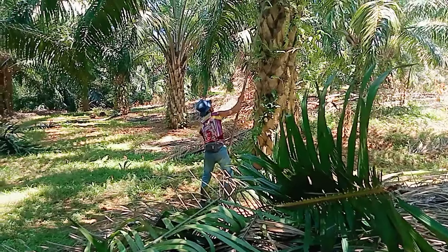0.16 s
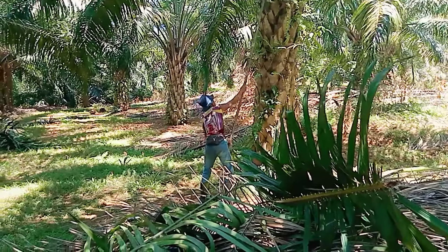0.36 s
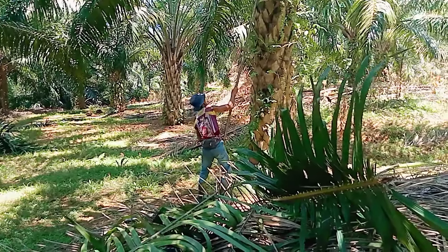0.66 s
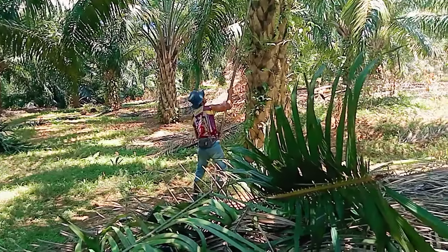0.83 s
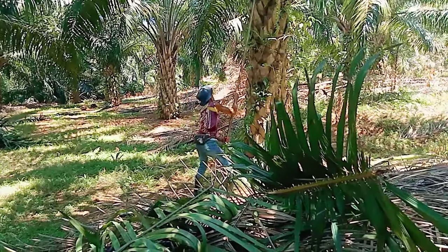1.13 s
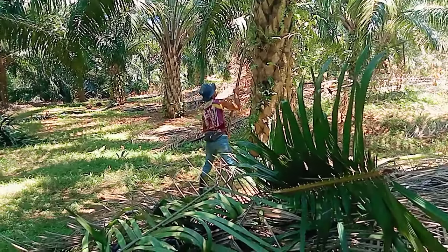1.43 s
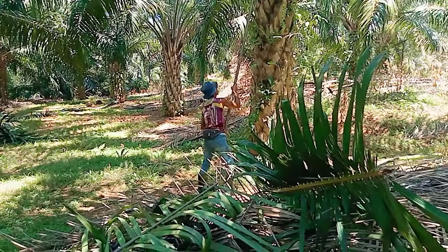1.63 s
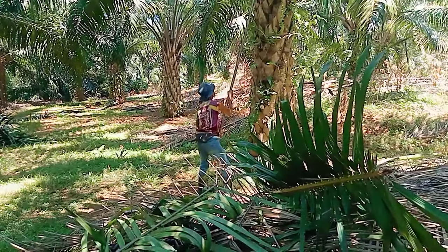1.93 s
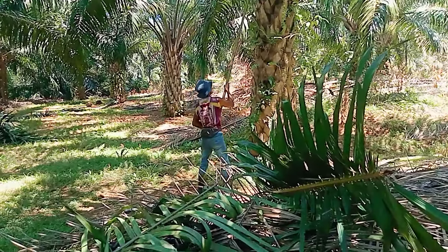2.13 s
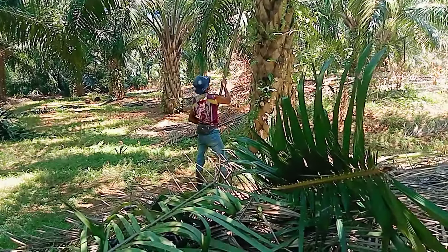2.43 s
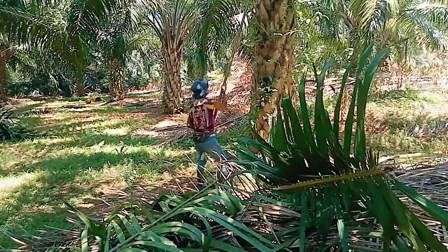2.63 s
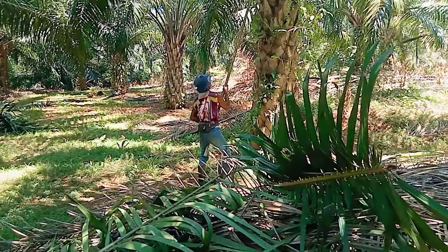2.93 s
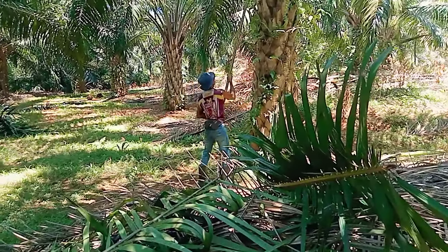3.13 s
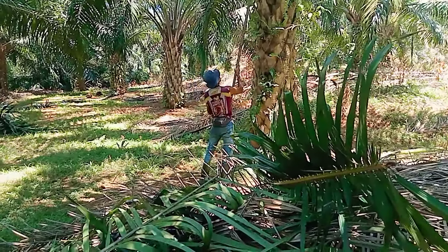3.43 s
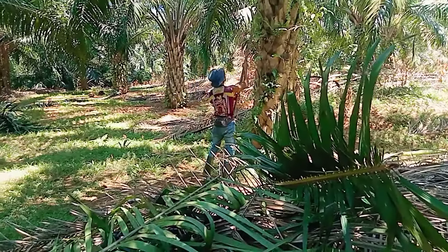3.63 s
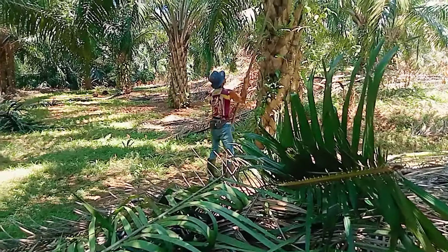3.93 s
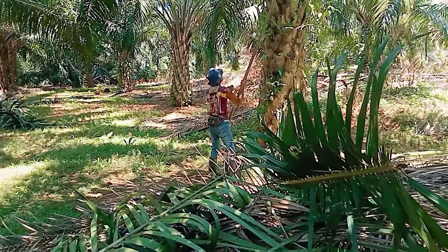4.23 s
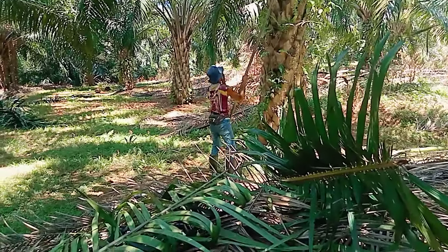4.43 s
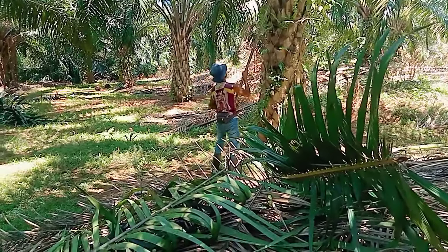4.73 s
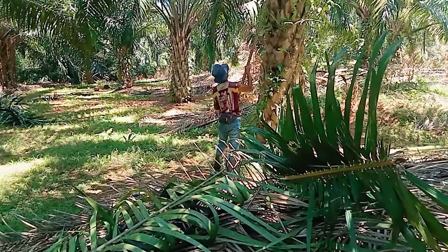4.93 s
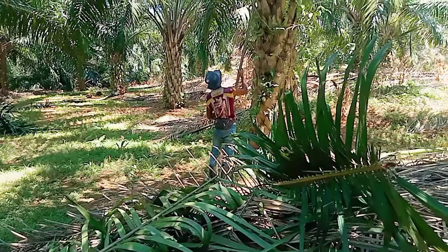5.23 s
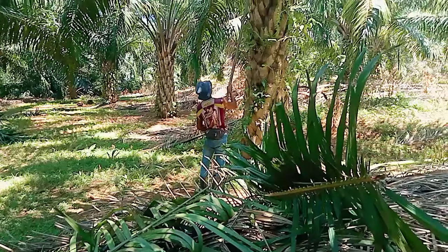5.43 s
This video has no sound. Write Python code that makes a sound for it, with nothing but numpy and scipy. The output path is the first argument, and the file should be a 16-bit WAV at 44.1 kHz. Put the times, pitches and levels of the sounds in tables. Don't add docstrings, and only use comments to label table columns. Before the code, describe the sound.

Irregular dull knocks and dry snaps on fibrous palm wood, leafy scraping, then a cut frond rustles down over a steady cicada drone.

```python
import sys
import numpy as np
from scipy import signal
from scipy.io import wavfile

SR = 44100
rng = np.random.default_rng(int(sys.argv[2]) if len(sys.argv) > 2 else 0)


def transcribe(u):
    v = np.clip(np.atleast_2d(u).T, -1, 1)
    q = np.round(v * 32767).astype(np.int16)
    wavfile.write(sys.argv[1], SR, q)


def decibels_to_gain(level_db):
    exponent = np.asarray(level_db, float) / 20
    return 10 ** exponent


N = 245637
CUT_S = 4.09


def rms_one(x):
    return x / np.sqrt(np.mean(x ** 2) + 1e-20)


def peak_one(x):
    return x / np.abs(x).max()


def in_time(rows):
    s, *columns = np.transpose(rows)
    return [np.interp(np.arange(N) / SR, s, column) for column in columns]


def band(x, low_hz, high_hz, order=2):
    sos = signal.butter(order, [low_hz, high_hz], "band", fs=SR, output="sos")
    return signal.sosfilt(sos, x)


def drift(rate_hz):
    r = np.exp(-80 * np.pi * rate_hz / SR)
    white = rng.standard_normal(N // 40 + 2002)
    slow = signal.lfilter([1], [1, -2 * r, r * r], white)[2000:]
    return np.interp(np.arange(N) / 40, np.arange(len(slow)), rms_one(slow))


def ring(clicks, hz, t60):
    r, w = decibels_to_gain(-60 / (t60 * SR)), 2 * np.pi * hz / SR
    return signal.lfilter([0, np.sin(w)], [1, -2 * r * np.cos(w), r * r], clicks + 1e-18)


def grains(per_s, spread_db, clump_db):
    size_db = spread_db * np.minimum(rng.exponential(1, N), 5)
    sizes = decibels_to_gain(size_db) * rng.choice([-1, 1], N)
    chance = per_s * decibels_to_gain(clump_db * drift(25)) / SR
    return rms_one(sizes * (rng.random(N) < chance))


def add(out, s, sound):
    at = int(s * SR)
    out[at:at + len(sound)] += sound[:N - at]


# start in seconds, peak level in dB, low mode in Hz, high mode in Hz,
# level of the high mode in dB re the low one.
KNOCKS = [(0.515, -39, 640, 1550, 2.5), (0.738, -44, 580, 1140, 4.5), (0.776, -42, 620, 2120, -3),
          (0.83, -42, 630, 2100, -5), (1.187, -33.5, 603, 1200, -12), (1.295, -26, 646, 1290, -11),
          (1.304, -35, 610, 1050, -14), (1.376, -24, 507, 1250, -2), (1.407, -18, 692, 1675, -5),
          (1.485, -28, 499, 997, -0.5), (1.814, -33, 460, 1040, -12), (2.198, -23, 641, 1175, -6),
          (2.226, -30.5, 303, 1660, -27), (2.592, -39.5, 433, 1900, -14), (2.856, -33.5, 747, 1145, -1.5),
          (2.922, -24.5, 770, 1673, -1.5), (2.997, -31.5, 385, 1060, -18), (3.338, -34.5, 263, 1570, -8),
          (3.538, -47.5, 680, 1570, -10), (4.064, -29, 280, 926, -28), (4.075, -26, 524, 1645, -10),
          (4.088, -28.5, 280, 1494, -7)]
# start in seconds, peak level in dB, low mode in Hz,
# high mode in Hz, level of the high mode in dB re the low one.
CHOPS = [(2.097, -51, 800, 2160, 3), (2.139, -24, 756, 1670, -6.5), (2.1476, -24.5, 1086, 1670, 2.5),
         (2.332, -49.5, 640, 2160, 5.5), (2.375, -27, 1300, 2120, -1), (2.477, -41.5, 1410, 2050, -4),
         (2.9289, -25, 674, 1670, 3.5), (3.284, -20, 318, 590, -11), (3.2918, -17.5, 560, 2060, -7.5),
         (3.2925, -24, 1120, 1600, -6), (3.555, -68, 770, 1930, -2), (4.3834, -15, 1080, 1640, 0.5)]
KNOCK_T60_S, CHOP_T60_S = 0.074, 0.024
KNOCK_CONTACT_S, CHOP_CONTACT_S = 0.0013, 0.0004


def wood_mode(push, crush, hz, t60, spread):
    t = np.arange(len(push)) / SR
    rings = rms_one(ring(push, hz, t60))
    for k in spread:
        rings = rings + 0.2 * rms_one(ring(push, hz * 1.51 ** k, 1.2 * t60))
    crush_shape = (1 - np.exp(-t / 0.0015)) * decibels_to_gain(-60 * t / (1.3 * t60))
    crushed = band(crush * crush_shape, 0.6 * hz, 1.6 * hz)
    both = peak_one(rings) + 0.28 * peak_one(crushed)
    return band(both, 0.58 * hz, 1.8 * hz) / np.abs(both).max()


def knocks():
    out, t = np.zeros(N), np.arange(int(0.2 * SR)) / SR
    blows = [(*row, KNOCK_T60_S, KNOCK_CONTACT_S) for row in KNOCKS]
    blows += [(*row, CHOP_T60_S, CHOP_CONTACT_S) for row in CHOPS]
    for s, peak_db, low_hz, high_hz, high_db, t60, contact in blows:
        crumble, low_crush, high_crush = rng.standard_normal((3, len(t)))
        low_spread, high_spread = rng.uniform(-0.35, 1, (2, 3))
        push = (crumble + 0.8) * t * np.exp(-t / contact)
        low = wood_mode(push, low_crush, low_hz, t60, low_spread)
        high = wood_mode(push, high_crush, high_hz, 0.75 * t60, high_spread)
        add(out, s - 1.222 * contact, decibels_to_gain(peak_db + 1.8) * (low + decibels_to_gain(high_db + 1.1) * high))
    return out


# start in seconds, peak level in dB.
CRACKS = [
    (0.507, -33.5),
    (1.328, -36),
    (2.1485, -29),
    (2.376, -31),
    (2.478, -43),
    (2.593, -35),
    (2.855, -36),
    (2.929, -19.5),
    (3.2912, -34),
    (4.3836, -22),
]


def cracks():
    out, t = np.zeros(N), np.arange(500) / SR
    for s, peak_db in CRACKS:
        burst = band(rng.standard_normal(len(t)) * np.exp(-t / 0.0012), 700, 7800, order=1)
        add(out, s, decibels_to_gain(peak_db) * peak_one(burst))
    return out


# start in seconds, peak
# level in dB, duller part in dB re the peak.
SNAPS = [(0.5094, -17, -16), (0.516, -19.5, -28), (0.729, -30, -24), (0.7362, -37, -22), (1.0614, -36, -17),
         (1.085, -37, -21), (1.1094, -38, -15), (1.1513, -36, -24), (1.2374, -45, -9), (1.3076, -39.5, 6.5),
         (1.328, -31, -19), (1.3763, -27, -12), (1.4068, -6.5, -16), (1.4143, -17, -21), (1.719, -38, -16),
         (1.932, -41, -4.5), (2.097, -48.5, 5.5), (2.119, -38, -4), (2.136, -26, -25), (2.148, -14.5, -36),
         (2.375, -25, -41), (2.3845, -32, -31), (2.478, -29, -29), (2.595, -29, -34), (2.854, -47, 9),
         (2.9124, -20, -28), (2.928, -20, -21), (3.2897, -30.5, 9.5), (3.556, -52, -12),
         (4.0706, -35.5, 1), (4.208, -27, -7), (4.224, -17, -28), (4.247, -23, -12),
              (4.2654, -18.5, -9), (4.2724, -31, -14), (4.383, -12.5, -7.5), (4.568, -28, -3.5),
              (4.605, -31, -15), (4.6244, -25, -16), (4.635, -28, -0.5), (4.739, -23, -23),
              (4.763, -18, -20), (4.785, -23, -25), (4.8013, -24, -23), (4.8514, -21, -8),
              (4.8824, -29, -18), (5.028, -21.5, -14), (5.237, -28, -14), (5.266, -23.5, -13),
              (5.361, -30, -13), (5.5355, -34, -10)]


def snaps():
    out, t = np.zeros(N), np.arange(600) / SR
    for s, peak_db, dull_db in SNAPS:
        burst = rng.standard_normal(len(t)) * np.exp(-t / 0.0012)
        bright = peak_one(band(burst, 5300, 11800))
        dull = peak_one(band(burst, 2600, 4230, order=1))
        add(out, s + 0.0005, decibels_to_gain(peak_db - 5) * (bright + decibels_to_gain(dull_db + 8.5) * dull))
    return out


# peak time in seconds, leaflet rustle in dB,
# stalk scrape in dB re the rustle, rise in seconds, fall in seconds.
DRAGS = [(.12, -57, 9.5, 0.032, 0.099), (0.181, -49.5, 8.5, 0.1, 0.043), (0.736, -41, 7.5, 0.021, 0.17),
         (.82, -42.5, 3.5, 0.08, 0.075), (1.084, -59.5, -1, 0.16, 0.12), (1.195, -59.5, 17.5, 0.062, 0.25),
         (1.243, -43.5, 11, 0.079, 0.041), (1.331, -39.5, -8, 0.0064, .15), (1.377, -25, 9.5, 0.053, .09),
         (1.49, -49, -0.5, .1, 0.31), (1.74, -56, -3, 0.19, 0.33), (2.355, -57, 13, 0.07, 0.086),
         (2.874, -57, 19.5, 0.03, 0.19), (2.924, -35.5, 7, 0.043, 0.079), (3.27, -56, 18.5, 0.05, 0.072),
         (3.34, -52, 5, 0.088, .26)]
# peak time in seconds, rustle in dB,
# stalk scrape in dB re the rustle, fall in seconds.
STIRS = [(0.515, -44, 4, 0.071), (1.811, -56.5, 18.5, 0.093), (1.93, -58.5, 10.5, .1),
         (2.143, -39, 9, 0.077), (2.2, -49.5, 11, 0.097), (2.376, -47, 6, 0.07), (2.48, -58, -4, 0.29),
         (2.594, -55, 3.5, .07), (3.0, -53.5, -8, 0.18), (3.295, -45, 15.5, 0.068), (3.561, -53, -19, 0.15),
         (4.085, -40, 2, 0.019), (4.39, -35, -15, 0.086), (4.6, -40, -18, 0.15), (5.029, -40.5, -5.5, 0.06),
         (5.499, -55.5, 4.5, .04)]
# time in seconds, rustle in dB, stalk swish in dB re the rustle.
FALL = [
    (4.06, -70, 16),
    (4.1, -47.5, 1),
    (4.21, -43, 5),
    (4.42, -41.5, 1),
    (4.74, -43, -7.5),
    (4.9, -36.5, -6),
    (5.06, -51, -7),
    (5.25, -49.5, -6.5),
    (5.57, -54.5, -24),
]
JOLT_RISE_S = 0.023
SPAN_DB = 19
STALK_STEEPER = 1.29
REST_DB, REST_STALK_DB = -67, -87


def stirring():
    t = np.arange(N) / SR
    fall_db, swish_db = in_time(FALL)
    falling = t > FALL[0][0]
    leaves = decibels_to_gain(REST_DB) ** 2 + falling * decibels_to_gain(fall_db) ** 2
    stalk = decibels_to_gain(REST_STALK_DB) ** 2 + falling * decibels_to_gain(fall_db + swish_db) ** 2
    jolts = [(s, db, stalk_db, JOLT_RISE_S, fall) for s, db, stalk_db, fall in STIRS]
    for s, db, stalk_db, rise, fall in [*DRAGS, *jolts]:
        near = slice(max(int((s - 3 * rise) * SR), 0), int((s + 3 * fall) * SR))
        after = t[near] - s
        loss_db = SPAN_DB * np.where(after < 0, -after / rise, after / fall)
        leaves[near] += decibels_to_gain(db - loss_db) ** 2
        stalk[near] += decibels_to_gain(db + stalk_db - STALK_STEEPER * loss_db) ** 2
    return 10 * np.log10(leaves), 10 * np.log10(stalk)


# frequency in Hz, level in dB, t60 in seconds.
STALK = [(280, -8.5, 0.045), (346, -6.5, 0.073), (487, -0.5, 0.041), (570, -2.5, 0.042), (638, 1.5, 0.06),
         (770, 3, 0.021), (1057, -8, 0.034), (1155, -6, 0.027), (1670, -15, 0.094)]
CRACKLE_DB, CRACKLE_FREE_DB = -9.5, -7
CRACKLE_SLOPE = 0.05


def strokes():
    rustle_db, scrape_db = stirring()
    held = np.arange(N) < CUT_S * SR
    rubbing = grains(6000, 2.7, clump_db=2.5)
    rustle = rms_one(band(rubbing, 980, 8950)) * decibels_to_gain(rustle_db + 1.0)

    crackle_db = rustle_db + np.where(held, CRACKLE_DB, CRACKLE_FREE_DB) + CRACKLE_SLOPE * (rustle_db + 50.5)
    edges = rubbing + 0.5 * grains(900, 0.74, clump_db=-7.5)
    crackle = rms_one(band(edges, 6060, 16660)) * decibels_to_gain(crackle_db + 6.5)

    slips = grains(2500, 3.2, clump_db=2.0) * decibels_to_gain(scrape_db - 2.0)
    body = np.zeros(N)
    for hz, db, t60 in STALK:
        body += decibels_to_gain(db - 34.5 + 2.5 * drift(8)) * ring(slips, hz, t60)
    body = band(body, 250, 8700) * decibels_to_gain(np.where(held, 1.5, -7))
    swish = np.where(held, 0.43 * band(slips, 140, 1620, order=3), 3.86 * band(slips, 89, 880))
    return rustle + crackle + body + swish


# start in seconds, peak level in dB.
BOUNCES = [
    (4.2657, -20.5),
    (4.273, -27),
    (4.3098, -22),
    (4.33, -41),
    (4.355, -23),
    (4.3767, -19),
]


def bounces():
    clicks = np.zeros(N)
    for s, peak_db in BOUNCES:
        clicks[int(s * SR)] = decibels_to_gain(peak_db - 3.0)
    clicks = band(clicks, 300, 2500, order=1)
    return ring(clicks, 785, t60=0.03) + ring(clicks, 1040, t60=0.021)


# start in seconds,
# frequency in Hz, level in dB, t60 in seconds.
BLADE = [(3.293, 2945, -45, .25), (3.293, 2920, -47, .25), (3.293, 2875, -49, .2), (3.293, 3030, -51, .1),
         (3.557, 3500, -53, .16), (3.557, 3515, -60, .1), (.722, 1150, -44, .1), (.736, 1150, -38, .08),
         (.09, 2800, -62, .2), (.12, 2740, -60, .15), (.122, 2050, -56, .09), (.15, 2150, -57, .09)]


def blade():
    out, t = np.zeros(N), np.arange(SR // 2) / SR
    for s, hz, db, t60 in BLADE:
        add(out, s, decibels_to_gain(db - 60 * t / t60) * np.sin(2 * np.pi * hz * t))
    return out


GROVE_T60_S, GROVE_DB = 0.12, -16.5


def grove(x):
    t = np.arange(int(0.5 * SR)) / SR
    tail = band(rng.standard_normal(len(t)), 150, 4100, order=1) * decibels_to_gain(-60 * t / GROVE_T60_S)
    tail = tail * (t > 0.004)
    return decibels_to_gain(GROVE_DB) * signal.fftconvolve(x, tail / np.sqrt(np.sum(tail ** 2)))[:N]


# centre in Hz, width in Hz, level in dB.
CICADAS = [(6840, 70, -17.5), (7005, 270, 2), (7437, 167, -0.5), (7620, 110, -2.5), (7735, 200, -7),
           (8750, 620, -20), (14100, 760, -11.5), (14400, 560, -12), (15070, 540, -8.5)]
# time in
# seconds, level in dB.
CICADA_DB = [
    (0.0, -50),
    (0.54, -52.5),
    (1.55, -50),
    (2.11, -50.5),
    (4.03, -52),
    (4.39, -53),
    (4.84, -40),
    (5.01, -49),
    (5.57, -51.5),
]


def cicadas():
    clicks = grains(6000, 0.63, clump_db=3.0)
    chorus = np.zeros(N)
    for hz, wide_hz, db in CICADAS:
        t60 = 1.6 / wide_hz
        voices = rms_one(ring(ring(clicks, hz, t60), hz, t60))
        chorus += decibels_to_gain(db + 0.31 * drift(47)) * voices
    return rms_one(chorus) * decibels_to_gain(in_time(CICADA_DB)[0] - 8)


# start in seconds, peak level in dB, length in seconds.
CHIRPS = [(0.118, -62, 0.026), (1.096, -65, 0.04), (1.752, -71, 0.04), (2.0194, -60, 0.034),
          (3.1223, -72, 0.056), (3.4466, -74, 0.04), (3.66, -73, 0.04), (3.79, -63, 0.029),
          (3.8094, -69, 0.036), (3.93, -65, 0.036)]


def cricket():
    out = np.zeros(N)
    for s, peak_db, length in CHIRPS:
        t = np.arange(int(length * SR)) / SR
        pulses = np.hanning(len(t)) * (0.6 + 0.4 * np.cos(2 * np.pi * 110 * t))
        trill = pulses * band(rng.standard_normal(len(t)), 5250, 5550)
        add(out, s, decibels_to_gain(peak_db + 7.5) * peak_one(trill))
    return out


# frequency in Hz, level in dB per Hz.
AIR = [(25, -24), (50, -9), (70, -7.5), (130, -4.5), (300, -12.5), (1000, -17), (3000, -30.5),
       (6000, -32.5), (16000, -48)]
AIR_DB = -59


def air():
    out, white = np.zeros(N), rng.standard_normal((2, N))
    edges = 22 * 2 ** np.arange(0, 9.6, 0.5)
    hz, db = np.transpose(AIR)
    together = drift(5.4)
    for k, (low, high) in enumerate(zip(edges, edges[1:])):
        middle_db = np.interp(np.log(low * high) / 2, np.log(hz), db)
        level_db = middle_db + 1.1 * together + 1.2 * drift(2)
        out += decibels_to_gain(level_db) * band(white[k % 2], low, high)
    return decibels_to_gain(AIR_DB) * rms_one(out)


HUM_HZ, HUM_WIDE_HZ, HUM_DB = 69.2, 13, -64.5


def hum():
    return decibels_to_gain(HUM_DB) * rms_one(ring(rng.standard_normal(N), HUM_HZ, 2.5 / HUM_WIDE_HZ))


def scene():
    hits = knocks() + bounces() + cracks() + snaps() + blade()
    near = hits + grove(hits) + strokes()
    return (near + cicadas() + cricket() + air() + hum())[None]


def top_cut(x):
    return signal.sosfilt(signal.butter(12, 16270, fs=SR, output="sos"), x)


# frequency in Hz, Q, gain in dB.
MIC = [(3600, 1.01, 6.5), (4846, 2.71, -11), (6050, 2.97, -4.5), (7370, 3.87, 12), (11340, 0.94, -8),
       (15600, 3.5, -1.5)]


def record(dry):
    x = signal.sosfilt(signal.butter(3, 55, "high", fs=SR, output="sos"), dry)
    for hz, q, db in MIC:
        a, w = decibels_to_gain(db / 2), 2 * np.pi * hz / SR
        k = np.sin(w) / (2 * q)
        above = [1 + k * a, -2 * np.cos(w), 1 - k * a]
        below = [1 + k / a, -2 * np.cos(w), 1 - k / a]
        x = signal.lfilter(above, below, x)
    x = signal.sosfilt(signal.ellip(12, 0.5, 48, 15480, fs=SR, output="sos"), x)
    return top_cut(x)


dry = scene()
out = record(dry)
transcribe(out)
```